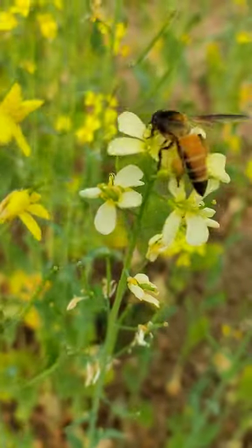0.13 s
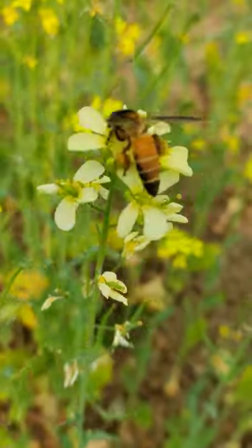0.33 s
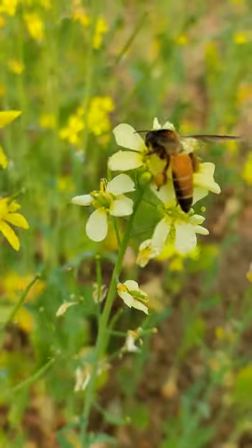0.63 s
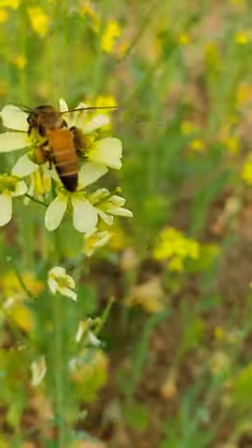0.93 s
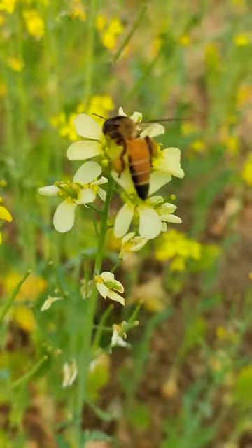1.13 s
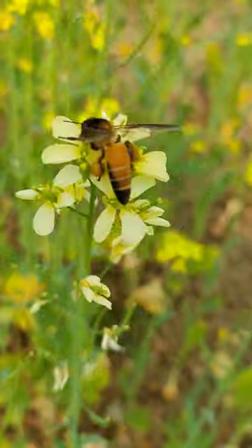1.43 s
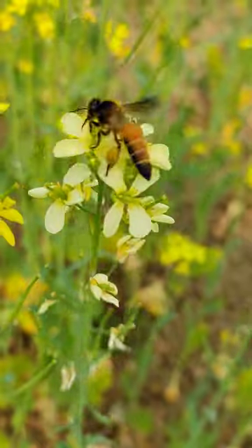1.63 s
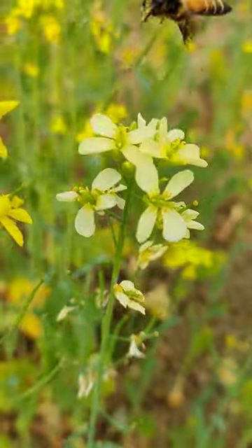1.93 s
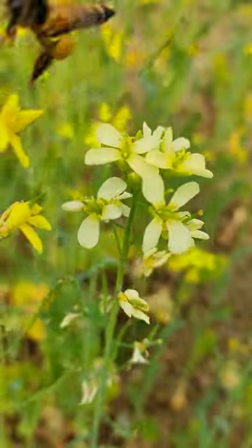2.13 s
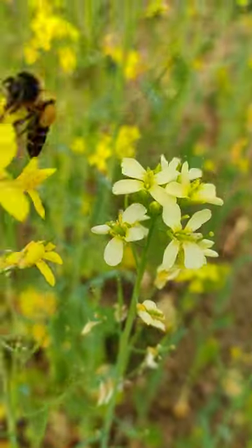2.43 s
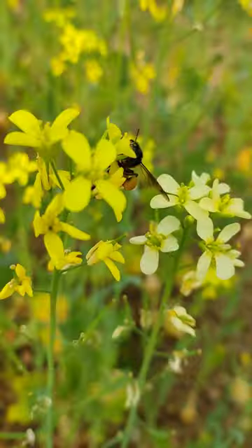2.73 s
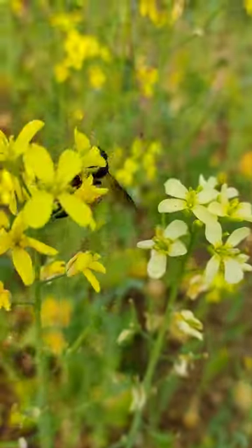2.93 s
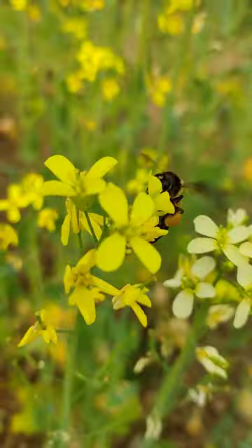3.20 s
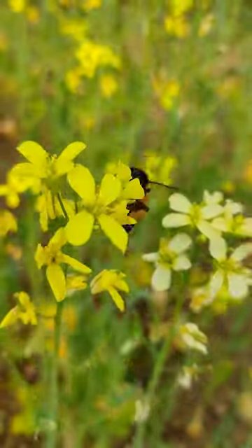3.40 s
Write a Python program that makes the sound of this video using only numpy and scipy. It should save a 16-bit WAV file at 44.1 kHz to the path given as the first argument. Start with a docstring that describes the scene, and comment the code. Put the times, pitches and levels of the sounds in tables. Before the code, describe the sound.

A bee takes off after nearly two seconds of wind rumble, its low raspy buzz swelling close at left, fading, then returning faintly; open field, phone stereo microphone, soft hiss and barely audible birds.

```python
"""A large bee lifts off a flower and hovers beside the left microphone of a phone in an open field,
then buzzes again further off: harmonics of its wingbeat plus noise pulsed by the strokes.
A light wind rumbles on each microphone port separately and puffs now and then: filtered noise and
short pushes. Far birds pipe faintly as wavering sines over field hush and hiss, and one small tick
sounds late on."""
import sys
import numpy as np
from scipy import signal
from scipy.fft import rfft, irfft
from scipy.io import wavfile
from scipy.ndimage import uniform_filter1d

SR = 44100
rng = np.random.default_rng(int(sys.argv[2]) if len(sys.argv) > 2 else 0)


def wrap_up_sound(samples):
    """Save the sound to the file named by the first command line argument, as 16-bit audio."""
    columns = np.atleast_2d(samples).T
    # keep every value between -1 and 1, then stretch to whole-number steps
    tamed = np.clip(columns, -1, 1)
    steps = np.round(tamed * 32767).astype(np.int16)
    wavfile.write(sys.argv[1], SR, steps)


N = 156996


def undb(db):
    """Amplitude ratio of a level: 20 dB is a factor of ten."""
    return 10 ** (np.asarray(db) / 20)


def unit(x):
    """Normalise to rms 1, so that a later gain sets the level."""
    return x / np.sqrt(np.mean(x ** 2))


def coloured(x, points, col=1):
    """Zero-phase filtering: the spectrum is weighted by (Hz, dB) points joined over log frequency."""
    p = np.array(points)
    hz = np.maximum(np.arange(len(x) // 2 + 1) * SR / len(x), 1)
    gain_db = np.interp(np.log(hz), np.log(p[:, 0]), p[:, col])
    return irfft(rfft(x) * undb(gain_db), len(x))


def walk(hz):
    """Low-pass random modulation: noise averaged twice over 1/hz seconds, with rms 1."""
    k = int(SR / hz)
    smooth = uniform_filter1d(rng.standard_normal(N), k)
    return unit(uniform_filter1d(smooth, k))


def rumble():
    """Turbulent pressure: a deep push and quicker fluttering eddies, uncorrelated between the ports."""
    # level of the deep push: (time [s], left level [dB], right level [dB])
    push_levels = [(0, -35.5, -47), (.04, -35, -41), (.14, -40.5, -41), (.36, -41, -40.5),
                   (.45, -42.5, -35.5), (.57, -42.5, -46.5), (.66, -39.5, -38.5), (.84, -43.5, -42),
                   (1.2, -48, -42.5), (1.55, -56.5, -41.5), (1.76, -40, -43), (1.93, -45, -60),
                   (2.0, -40, -40.5), (2.19, -45, -46), (2.45, -42.5, -37.5), (2.76, -45, -42),
                   (2.91, -51, -41), (3.04, -45.5, -44.5), (3.12, -36.5, -42), (3.3, -51, -42.5),
                   (3.4, -55, -44), (3.56, -47.5, -42.5)]
    # spectrum of the deep push: (frequency [Hz], relative level [dB per Hz])
    deep_colour = [(3, 11.5), (12, 13), (45, 10), (80, -3.5), (120, -21.5), (200, -56.5)]
    # spectrum of the eddies: (frequency [Hz], relative level [dB per Hz])
    eddy_colour = [(40, -12), (90, 2), (150, -9.5), (250, -21.5), (400, -33), (800, -58)]
    eddy_db = -12  # relative to the deep push
    turbulence_db, turbulence_hz = 1.5, 26.9  # rms depth and rate of the level changes feeding the eddies
    t = np.arange(N) / SR
    s, *ports_db = np.array(push_levels).T
    ports = []
    for db in ports_db:
        deep = unit(coloured(rng.standard_normal(N), deep_colour))
        uneven = rng.standard_normal(N) * undb(turbulence_db * walk(turbulence_hz))
        eddies = unit(coloured(uneven, eddy_colour))
        ports.append((deep + undb(eddy_db) * eddies) * undb(np.interp(t, s, db)))
    return np.array(ports)


def hush():
    """Stationary broadband noise of field and microphone, louder on the left in the middle range."""
    # noise density: (frequency [Hz], left level [dB per Hz], right level [dB per Hz])
    density = [(150, -100, -102), (342, -100, -103), (764, -101, -108), (2105, -108, -113),
               (4910, -117, -118), (8800, -123, -125), (11850, -121, -122), (14800, -118, -118)]
    flicker_db = .4  # rms
    sides = []
    for col in (1, 2):
        noise = coloured(rng.standard_normal(N), density, col=col)
        sides.append(noise * undb(flicker_db * walk(30)))
    return np.array(sides) * np.sqrt(SR / 2)  # white noise of rms 1 spreads its power over SR / 2


def puffs():
    """Bursts of eddies, one port each; the shorter, the nearer to an impulse: left push or right suck."""
    # (centre time [s], port and sign [0 left push to 1 right suck; near .5 little push],
    #  level at the peak [dB], length [s, two Gaussian deviations], high part relative to low part [dB])
    gusts = [(0.038,0.25,-32.5,0.029,-27.5), (0.081,0,-35,0.016,-14), (0.105,0,-37,0.017,-14),
             (0.157,0,-44.5,0.083,-29), (0.188,0.91,-37.5,0.018,-22), (0.232,0.94,-33,0.012,-18),
             (0.42,0.065,-37.5,0.013,-12), (0.496,0,-41,0.04,-29), (0.528,0,-44.5,0.032,-13.5),
             (0.623,0.06,-46,0.033,-16), (0.668,0.039,-33,0.025,-27), (0.752,0.63,-43.5,0.022,-21),
             (0.799,0.82,-47.5,0.11,-21.5), (0.952,1,-40,0.072,-20.5), (0.958,0,-46.5,0.053,-30),
             (1.014,1,-48,0.055,-17), (1.473,0.67,-47,0.013,-14.5), (1.626,1,-54.5,0.015,-10),
             (1.71,1,-45.5,0.13,-22), (1.743,0,-45,0.02,-37), (1.752,1,-41.5,0.0089,-17),
             (1.778,0.73,-34,0.02,-25), (1.807,0.8,-42,0.013,-22), (1.85,1,-48,0.13,-14.5),
             (1.854,0.5,-53,0.027,-25), (1.993,0.91,-43.5,0.04,-17), (2.328,0.1,-41,0.014,-25),
             (2.477,0,-49,0.085,-25), (3.193,1,-44.5,0.02,-24)]
    # spectrum of the low part: (frequency [Hz], relative level [dB per Hz])
    low_colour = [(20, -4), (55, 4), (110, 5), (180, -1), (280, -13.5), (500, -46.5)]
    # spectrum of the high part: (frequency [Hz], relative level [dB per Hz])
    high_colour = [(150, 4.5), (350, 9), (600, -4), (900, -13.5), (1500, -42)]
    snap_s = .013  # puffs up to this length are the sharpest
    size = 16384
    out = np.zeros((2, N + size))
    t = (np.arange(size) - size // 2) / SR
    impulse = 1. * (t == 0)
    for s, port, db, length, bright_db in gusts:
        shape = np.exp(-.5 * (t / (.5 * length)) ** 2)
        sharp = .9 * min(snap_s / length, 1) ** 2
        burst = 0
        for colour, part_db in ((low_colour, db), (high_colour, db + bright_db)):
            push = (1 - 2 * port) * unit(shape * coloured(impulse, colour))
            eddies = unit(shape * coloured(rng.standard_normal(size), colour))
            mix = unit(sharp * push + np.sqrt(1 - sharp ** 2) * eddies)
            # scaling by the rms of the envelope puts the level at its peak
            burst = burst + undb(part_db) * mix * np.sqrt(np.mean(shape ** 2))
        i = int(s * SR)
        out[int(port > .5), i:i + size] += burst
    return out[:, size // 2:size // 2 + N]


def birds():
    """Narrow-band tones: thin sines wavering in pitch and level, weaker on the right."""
    # (start time [s], length [s], mean pitch [Hz], mean level on the left [dB])
    notes = [(.05, .33, 2070, -88), (.255, .045, 3200, -87), (1.33, .33, 755, -85),
             (1.665, .055, 2660, -86), (1.675, .032, 3060, -84), (1.72, .04, 3070, -84)]
    waver_db = 4.5  # rms
    t = np.arange(N) / SR
    out = np.zeros(N)
    for s, length, hz, db in notes:
        on = uniform_filter1d(1. * ((t > s) & (t < s + length)), 600)
        cycles = np.cumsum(hz * (1 + .012 * walk(40))) / SR
        tone = np.sqrt(2) * np.sin(2 * np.pi * cycles)
        out = out + on * undb(db + waver_db * walk(20)) * tone
    return out * np.array([[1], [.3]])


def bee():
    """Periodic wing forces: harmonics lining up into a dip each beat, and air noise on each stroke."""
    # one list a flight, near then far: (time [s], wingbeat [Hz], second harmonic level [dB],
    #  reference level of the overtones [dB], swish level [dB])
    flights = [
        [(1.73, 128, -72, -74, -82), (1.79, 137, -61, -67, -74), (1.85, 146.5, -57.5, -60, -71),
         (1.93, 149, -56, -60.5, -70), (2.0, 151, -55, -59, -71), (2.05, 140, -58, -60, -68.5),
         (2.1, 149, -52.5, -56, -66), (2.17, 146, -59.5, -59.5, -67), (2.235, 149.5, -51, -55, -64),
         (2.285, 147, -50, -51.5, -66), (2.32, 146.5, -54, -64, -68), (2.36, 147, -51, -56.5, -68.5),
         (2.44, 142.5, -56.5, -64, -73), (2.5, 138.7, -55.5, -67, -77), (2.57, 133.5, -62, -69, -76),
         (2.64, 133, -75, -76, -79)],
        [(3.1, 140, -80, -74, -84), (3.15, 141, -70, -67, -81), (3.25, 142.5, -69, -66, -80),
         (3.36, 143.5, -70, -66, -80), (3.44, 141, -75, -74, -84), (3.52, 141, -80, -85, -90)],
    ]
    # third harmonic upwards, one list a flight: (level relative to the overtone reference [dB], ...)
    overtone_levels = [
        [-11, -14, -8.5, -14, -15, -22, -22, -29, -33],
        [-10, -12, -24],
    ]
    # spectrum of the swish: (frequency [Hz], relative level [dB per Hz])
    swish_colour = [(450, -1), (950, 1), (1700, -7), (4000, -13), (7500, -13), (11000, -17), (14000, -15)]
    fundamental_db = -16  # relative to the second harmonic
    right_db = -24  # right side relative to left
    pitch_jitter, wobble_turns = .012, .035  # rms: fraction of the wingbeat, turns of phase
    flutter_db, flutter_hz = 2.2, 30  # each overtone singly
    rasp_db, rasp_hz = 2.5, 150  # quick unevenness of the overtones together
    stroke_width, upstroke = .3, .6  # decay in beats, upstroke strength relative to the downstroke
    t = np.arange(N) / SR
    out = np.zeros(N)
    for flight, parts_db in zip(flights, overtone_levels):
        s, hz, hum_db, bright_db, swish_db = np.array(flight).T
        beat = np.cumsum(np.interp(t, s, hz) * (1 + pitch_jitter * walk(45))) / SR

        def partial(k):
            """Harmonic k of the beat, rms 1, with a phase wobble that grows as the root of k."""
            turns = k * beat + wobble_turns * np.sqrt(k) * walk(110)
            return -np.sqrt(2) * np.cos(2 * np.pi * turns)

        second = undb(flutter_db / 2 * walk(flutter_hz)) * partial(2)
        hum = undb(fundamental_db) * partial(1) + second
        overtones = np.zeros(N)
        for k, part_db in enumerate(parts_db, start=3):
            overtones += undb(part_db + flutter_db * walk(flutter_hz)) * partial(k)
        rasp = unit(undb(rasp_db * walk(rasp_hz)))

        downstrokes = np.exp(-(beat % 1) / stroke_width)
        upstrokes = upstroke * np.exp(-((beat + .5) % 1) / stroke_width)
        air = (downstrokes + upstrokes) * rng.standard_normal(N)
        swish = undb(walk(flutter_hz)) * unit(coloured(air, swish_colour))

        buzz = undb(np.interp(t, s, hum_db)) * hum
        buzz += undb(np.interp(t, s, bright_db)) * rasp * overtones
        buzz += undb(np.interp(t, s, swish_db)) * swish
        flying = uniform_filter1d(1. * ((t > s[0]) & (t < s[-1])), size=2000)
        out = out + flying * buzz
    return out * np.array([[1], [undb(right_db)]])


def tick():
    """Damped oscillation: one small tick, a sine dying away exponentially, weaker on the right."""
    start_s, hz, db, decay_s = 3.497, 2550, -59.5, .0016
    t = np.arange(N) / SR
    decay = (t > start_s) * np.exp(-np.abs(t - start_s) / decay_s)
    return undb(db) * decay * np.sin(2 * np.pi * hz * t) * np.array([[1], [.3]])


def scene():
    """Superposition of all sources, the wind low-passed at 1300 Hz."""
    low_pass = signal.butter(3, 1300, fs=SR, output="sos")
    wind = signal.sosfilt(low_pass, rumble() + puffs())
    return wind + hush() + birds() + bee() + tick()


def record(dry):
    """Band limiting: the phone cuts the top steeply with an elliptic low-pass."""
    top_hz = 14250
    low_pass = signal.ellip(12, .2, 60, top_hz, fs=SR, output="sos")  # .2 dB ripple, 60 dB stop
    return signal.sosfilt(low_pass, dry)


dry = scene()
out = record(dry)
wrap_up_sound(out)
```